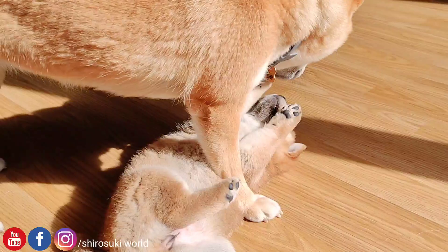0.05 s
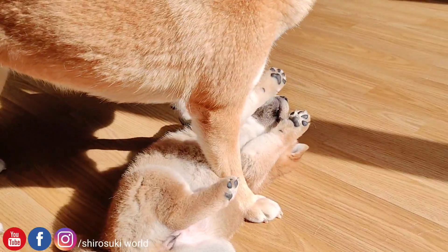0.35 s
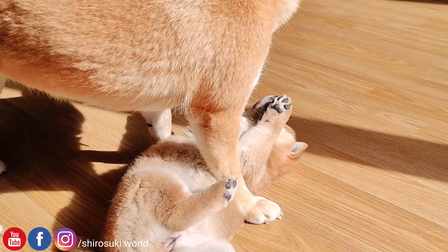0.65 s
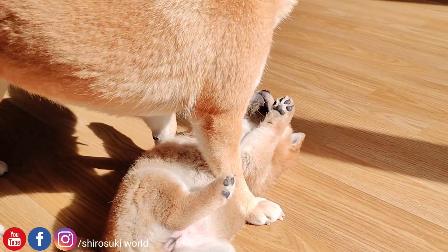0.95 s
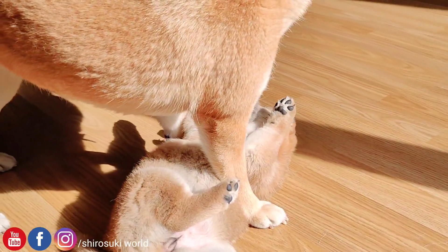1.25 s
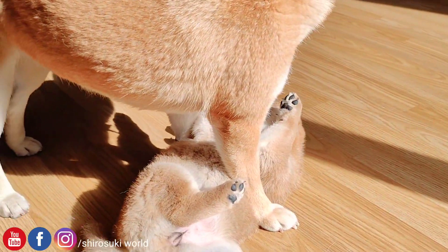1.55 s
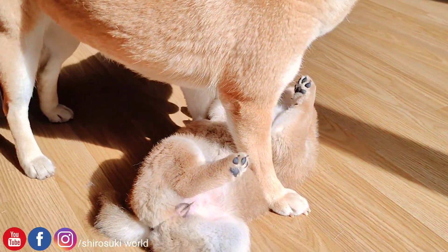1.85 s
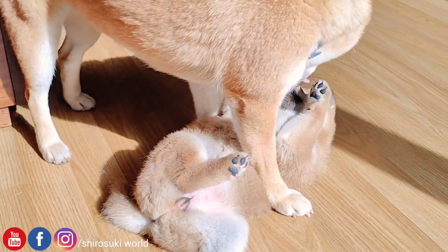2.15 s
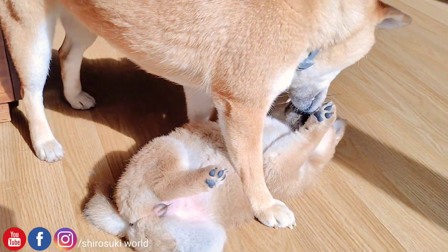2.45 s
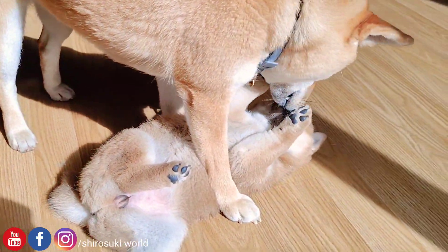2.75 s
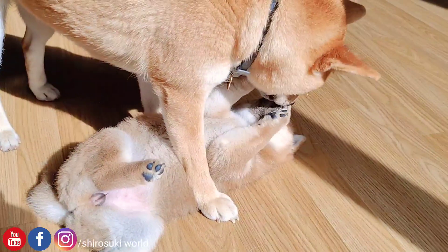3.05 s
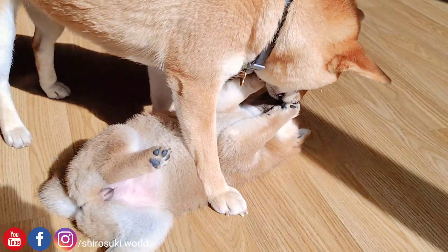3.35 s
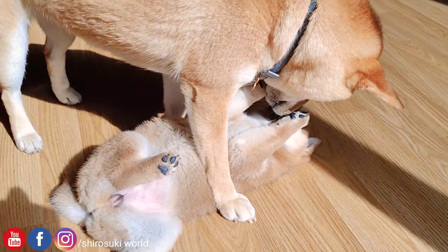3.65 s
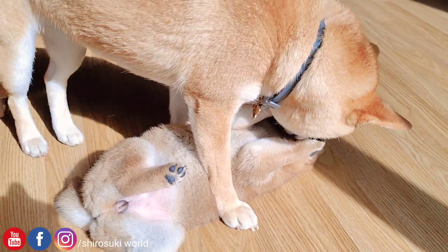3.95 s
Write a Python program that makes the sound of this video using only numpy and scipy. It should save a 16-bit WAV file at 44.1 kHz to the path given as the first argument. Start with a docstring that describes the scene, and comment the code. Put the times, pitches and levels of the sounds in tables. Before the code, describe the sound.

A muffled vehicle rumbles outside while a dog and puppy shuffle softly on a wooden floor.

```python
"""A low drone comes through the walls: probably a vehicle outside, pulling up through two gears, with rumble.
Close by, a dog stands over a puppy on a wooden floor. Fur brushes the boards, claws and teeth tick,
pads squeak on the varnish, the dog sniffs once, the puppy slides.
Under it lie the room's murmur and a faint hiss."""
import sys
import numpy as np
from scipy import signal
from scipy.fft import rfft, irfft, next_fast_len
from scipy.io import wavfile
from scipy.ndimage import map_coordinates

SR = 44100
rng = np.random.default_rng(int(sys.argv[2]) if len(sys.argv) > 2 else 0)


def to_wav(s):
    """Save 16-bit WAV."""
    ch = np.atleast_2d(s).T  # columns
    pcm = np.round(np.clip(ch, -1, 1) * 32767)  # PCM
    wavfile.write(sys.argv[1], SR, pcm.astype(np.int16))


N = 176400

# engine, per gear (time [s], firing rate [Hz], order 1 [dB], order 2 [dB], order 3 [dB])
ENGINE_LOW_GEAR = [(0.0, 46.85, -25.5, -33, -49), (0.09, 51.55, -29, -55, -50),
                   (0.15, 55.25, -23.5, -41.5, -55), (0.23, 60.6, -25, -31, -40.5),
                   (0.332, 62.17, -32.5, -45, -37), (0.55, 70.66, -28, -43.5, -50.5),
                   (0.66, 68.16, -31, -51, -63), (0.734, 70.7, -34, -54, -54), (0.775, 71, -32.5, -56, -69)]
ENGINE_HIGH_GEAR = [(1.425, 46.06, -38, -66, -61), (1.65, 47, -31, -52, -51),
                    (1.74, 48.46, -43.5, -51, -51), (1.87, 50.47, -38, -57, -60),
                    (1.94, 51.84, -58, -60, -66), (2.03, 53.14, -40, -43, -56),
                    (2.24, 56.5, -53, -35.5, -48), (2.46, 60.6, -36, -42.5, -53.5),
                    (2.62, 62.94, -46, -50, -81), (2.71, 64.86, -33, -48.5, -60),
                    (3.05, 69.36, -42.5, -56, -69), (3.22, 72.6, -35, -41.5, -46),
                    (3.27, 74, -35, -68, -64), (3.31, 72.4, -46, -62, -70), (3.49, 76.3, -44, -64, -70)]
# upper engine orders (order, level re order 3 [dB])
UPPER_ORDERS = [(4, -7), (5, -19.5), (6, -17.5), (7, -13.5)]

# envelopes (time [s], level [dB])
ROAD_LEVEL = [(0.0, -41), (0.1, -40), (0.35, -36.5), (0.7, -41), (1.29, -51), (1.47, -44.5), (2.28, -46.5),
              (2.91, -50.5), (3.27, -44.5), (3.3, -54.5), (4.0, -54.5)]  # before trim_db
RUMBLE_LEVEL = [(0,-35),(.5,-37),(.85,-43.5),(1.18,-42.5),(1.33,-47.5),(1.6,-42),(2.2,-42.5),(2.8,-42.5),(3.18,-39.5),(3.5,-49.5),(3.8,-45.5),(4,-45)]
MURMUR_GAIN = [(.75,3),(1.3,-5.5),(1.7,1),(2.7,2),(3.05,3.5),(3.55,1.5)]  # added to the mode levels
HISS_LEVEL = [(0,-65.5),(1.1,-75),(1.4,-69.5),(1.52,-58.5),(2.15,-59),(2.45,-54),(2.75,-57),(3.2,-56.5),(3.3,-65.5),(3.62,-63),(3.9,-53.5),(4,-57.5)]
FIZZ_LEVEL = [(0,-78),(1.38,-75),(1.53,-59.5),(2.4,-55),(2.9,-59),(3.3,-78)]  # topmost hiss
FUR_LEVEL = [(0,-75),(.12,-58),(.16,-55.5),(.4,-59),(1.05,-67),(1.36,-61),(1.5,-55.5),(1.62,-55),(1.78,-50.5),(2,-53.5),(2.1,-58),(2.35,-56),(2.5,-51),(2.65,-62),(2.85,-63),(3.05,-53.5),(3.3,-59.5),(3.7,-60.5),(3.83,-55)]

# noise spectra (frequency [Hz], relative level [dB])
ROAD_SPECTRUM = [(90,-46),(150,-13),(200,-1.5),(275,-1.5),(320,-11.5),(380,-10.5),(450,-9.5),(560,-10),(700,-17),(1050,-27),(1450,-23),(3000,-25.5),(11000,-45.5)]
RUMBLE_SPECTRUM = [(18,-7.5),(30,-9),(41,0.5),(55,-1.5),(75,-12.5),(97,-5.5),(300,-58.5)]
AIR_SPECTRUM = [(180, -41), (300, -3.5), (518, -4.5), (609, -12), (800, -9.5), (2030, -15.5), (2760, -20.5),
                (14000, -42)]
HISS_SPECTRUM = [(500,1),(1500,-5.5),(3500,-1.5),(5400,4.5),(6400,10),(7100,10.5),(7700,-4),(11500,-10),(14000,-0.5)]
FIZZ_SPECTRUM = [(6000,-29),(8500,-1.5),(11500,-4),(14000,-0.5)]
FUR_SPECTRUM = [(150,-28),(500,-2),(1000,7),(1600,1.5),(2600,2),(4500,2.5),(5900,-8),(9500,-5),(12000,-9),(14500,-10.5)]
SNIFF_SPECTRUM = [(300,2),(1000,-1),(2000,3),(3200,4),(5000,4.5),(6800,7),(8000,-3),(10500,-1),(13000,-14)]
SLIDE_SPECTRUM = [(120,-16),(300,-16),(700,1),(1300,1.5),(2300,-4),(4000,-5),(8000,-32)]

# room resonances (centre [Hz], half-width [Hz], level before MURMUR_GAIN [dB])
MURMUR_MODES = [(95.5,15,-57),(148.3,18,-56.5),(198,18.4,-57.5),(244,13.4,-54.5),(269.2,14,-58),(453.4,19,-66),(555,34,-68),(1044,212,-58.5)]
# claws, pads, teeth (time [s], level [dB], low edge [Hz], high edge [Hz], T60 [s], left-right [dB])
CONTACTS = [(0.14,-49,2500,10000,0.043,-8.5),(0.234,-50,6500,11000,0.012,-4),(1.611,-41,400,700,0.035,7),(1.646,-47,446,1500,0.095,-1),(1.776,-43.5,1500,5500,0.022,2),
            (1.969,-32.5,322,900,0.036,0),(1.9709,-39,1100,3800,0.02,-4),(2.4364,-40,5970,11000,.011,-2),(2.4435,-29,3000,13000,0.0089,-5),(2.4432,-35,550,2205,0.017,-4),
            (2.6765,-33,700,5030,0.0074,-15),(2.869,-45,4500,7000,0.017,-8),(2.979,-42,4220,5000,0.022,-8),(3.056,-46.5,4600,6380,0.023,-13),(3.072,-43,2600,3400,0.023,0),
            (3.201,-34.5,1200,4786,0.011,-9),(3.805,-48,400,1300,0.033,5)]
# pads on varnish (time [s], release [s], centre [Hz], half-width [Hz], level [dB])
PAD_SLIPS = [(1.448, 0.015, 2670, 550, -51), (1.469, 0.016, 2600, 450, -51), (1.62, .1, 2430, 450, -58.5)]
# dog's sniff, puppy's slide (time [s], rise [s], hold [s], release [s], level [dB])
SNIFF_SWELLS = [(3.035, 0.09, 0.054, 0.089, -47.5)]
SLIDE_SWELLS = [(3.714, 0.11, .22, .15, -52.5)]

# left-right likeness of the noise (frequency [Hz], correlation)
STEREO_CORRELATION = [(60,0.99),(130,0.78),(250,0.95),(500,0.58),(1000,-0.067)]
# microphone mismatch (frequency [Hz], left-right [dB])
MIC_BALANCE = [(200,0),(550,3),(1100,-2.5),(2200,-2),(5000,-5),(9000,2.5),(13000,-1.5)]


def amp(db):
    """Decibels to gain."""
    return 10 ** (np.asarray(db) / 20)


def unit(x):
    """Scale to rms 1."""
    return x / np.sqrt(np.mean(x ** 2) + 1e-20)


def along(points, hz):
    """Interpolate (frequency [Hz], value) on a log axis."""
    knots_hz, values = np.transpose(points)
    return np.interp(np.log(hz + 1), np.log(knots_hz + 1), values)


def curves(rows):
    """Per-sample values of each column after the time."""
    times_s, *columns = np.transpose(rows)
    return [np.interp(np.arange(N) / SR, times_s, column) for column in columns]


def wobble(rate_hz):
    """Smooth random curve, knots at rate_hz."""
    knots = rng.standard_normal(int(N * rate_hz / SR) + 4)
    return map_coordinates(knots, [np.arange(N) * rate_hz / SR])


def filtered(x, response):
    """Apply a frequency response."""
    size = next_fast_len(N + SR // 2)
    return irfft(rfft(x, size) * response(np.fft.rfftfreq(size, 1 / SR)), size)[..., :N]


def pan(db):
    """Stereo gains for a left-right difference."""
    return unit(amp(np.array([[db], [-db]]) / 2))


def noise(response):
    """Stereo noise, rms 1: alike in the bass, unrelated in the treble."""
    def mid_side(hz):
        angle = np.arccos(np.clip(along(STEREO_CORRELATION, hz), -1, 1)) / 2
        return response(hz) * np.array([np.cos(angle), np.sin(angle)])
    mid, side = filtered(rng.standard_normal((2, N)), mid_side)
    return unit(np.array([mid + side, mid - side]))


def rush(spectrum):
    """Noise with a tabled spectrum."""
    return noise(lambda hz: amp(along(spectrum, hz)))


def band(centre_hz, half_width_hz):
    """Noise in one resonance, 12 dB down at the half-width."""
    return noise(lambda hz: 1 / (1 + ((hz - centre_hz) / half_width_hz) ** 2) ** 2)


def swell(start_s, rise_s, hold_s, release_s):
    """Smooth rise, hold and release."""
    corners_s = start_s + np.cumsum([0, rise_s, hold_s, release_s])
    return np.sin(np.pi / 2 * np.interp(np.arange(N) / SR, corners_s, [0, 1, 1, 0])) ** 2


def engine(gear, jitter=0.0032, flutter_db=1, waver_db=1, fade_s=0.025):
    """The firing rate climbs through one gear; only its lowest orders pass the walls."""
    firing_hz, first_db, second_db, third_db = curves(gear)
    phase = 2 * np.pi * np.cumsum(firing_hz * (1 + jitter * wobble(24.65))) / SR
    orders = [(1, first_db), (2, second_db), (3, third_db)]
    orders += [(k, third_db + db + flutter_db * wobble(16)) for k, db in UPPER_ORDERS]
    drone = sum(amp(db) * np.sin(k * phase + rng.uniform(0, 2 * np.pi)) for k, db in orders)
    start_s, end_s = gear[0][0], gear[-1][0]
    gate = swell(start_s - fade_s, fade_s, end_s - start_s, fade_s)
    return np.sqrt(2) * drone * amp(waver_db * wobble(28.08)) * gate


def road(trim_db=-6):
    """Dull road noise and a deep rumble come with the engine."""
    roll = amp(curves(ROAD_LEVEL)[0] + trim_db) * rush(ROAD_SPECTRUM)
    rumble = amp(curves(RUMBLE_LEVEL)[0]) * rush(RUMBLE_SPECTRUM)
    return roll + rumble


def murmur():
    """Room resonances and air, drifting together in level."""
    modes = sum(amp(db) * band(hz, half_width_hz) for hz, half_width_hz, db in MURMUR_MODES)
    air = amp(-57) * rush(AIR_SPECTRUM)
    return amp(curves(MURMUR_GAIN)[0]) * (modes + air) * pan(db=-2)


def hiss(flicker_db=1.1):
    """A high hiss comes and goes on the right."""
    high = amp(curves(HISS_LEVEL)[0] + flicker_db * wobble(15)) * rush(HISS_SPECTRUM)
    fizz = amp(curves(FIZZ_LEVEL)[0]) * rush(FIZZ_SPECTRUM)
    return (high + fizz) * pan(db=-15.5)


def scratches(rate_hz=30, decay_s=0.0013, gain_db=1.5):
    """Stiff hairs snag and let go: tiny bright bursts."""
    snags = (rng.random(N) < rate_hz / SR) * rng.random(N)
    decay = np.exp(-np.arange(SR // 20) / SR / decay_s)
    return amp(gain_db) * signal.fftconvolve(snags, decay)[:N] * band(4600, 3500)


def fur(stroke_db=1.3, grain_db=2):
    """Hairs catch and slip on the boards as the puppy wriggles; a whole-body slide is duller."""
    grains = unit(amp(stroke_db * wobble(21.82) + grain_db * wobble(350)))
    brush = amp(curves(FUR_LEVEL)[0]) * (rush(FUR_SPECTRUM) + scratches())
    slide = sum(amp(db) * swell(*timing_s) for *timing_s, db in SLIDE_SWELLS) * rush(SLIDE_SPECTRUM)
    return (brush + slide) * grains * pan(db=2)


def ticks(tilt=0.55, snap=0.85, attack_s=0.0006):
    """Each claw, pad or tooth contact: one clean snap and a damped crackle, in the contact's band."""
    out = np.zeros((2, N + SR))
    t = np.arange(SR // 8) / SR
    j_hz = 1j * (np.fft.rfftfreq(len(t), 1 / SR) + 1)
    edge = lambda ratio: 1 / (1 + np.sqrt(2) * ratio + ratio * ratio) ** 2  # 24 dB/octave
    for start_s, db, low_hz, high_hz, t60_s, pan_db in CONTACTS:
        envelope = amp(db - 60 * t / t60_s) * (1 - np.exp(-t / attack_s))
        force = envelope * rng.standard_normal((2, len(t)))
        force[:, np.argmax(envelope) // 2] += snap * np.linalg.norm(envelope)
        response = edge(low_hz / j_hz) * edge(j_hz / high_hz) / j_hz ** tilt
        rms_gain = np.sqrt(np.mean(abs(response) ** 2) * (1 + snap ** 2))
        tick = irfft(rfft(force) * response, len(t)) / rms_gain
        onset = round(start_s * SR)
        out[:, onset:onset + len(t)] += tick * pan(pan_db)
    return out[:, :N]


def room(x, t60_s=0.077, echo_db=-2.5):
    """Add the short echo of a furnished room."""
    t = np.arange(SR // 2) / SR
    tail = rng.standard_normal((2, len(t))) * amp(-60 * t / t60_s)
    tail /= np.linalg.norm(tail[0])
    return x + amp(echo_db) * signal.fftconvolve(x, tail, axes=1)[:, :N]


def squeaks(rough_db=2):
    """Pads slip briefly on the varnish."""
    slips = sum(amp(db) * swell(start_s, release_s / 2, 0, release_s) * band(hz, half_width_hz)
                for start_s, release_s, hz, half_width_hz, db in PAD_SLIPS)
    return slips * amp(rough_db * wobble(120))


def sniff(flutter_db=1):
    """Air hisses unevenly through the dog's nose, buried in fur."""
    flow = sum(amp(db) * swell(*timing_s) for *timing_s, db in SNIFF_SWELLS)
    return flow * amp(-flutter_db * wobble(190)) * rush(SNIFF_SPECTRUM) * pan(db=-3)


def scene():
    """Dogs close by, vehicle beyond the walls, room background."""
    dogs = room(ticks() + squeaks()) + fur() + sniff()
    vehicle = engine(ENGINE_LOW_GEAR) + engine(ENGINE_HIGH_GEAR) + road()
    return dogs + vehicle + murmur() + hiss()


def record(dry):
    """Two band-limited microphones, slightly unlike in colour."""
    top_hz = 14350
    return filtered(dry, lambda hz: amp(np.outer([.5, -.5], along(MIC_BALANCE, hz))) * (hz < top_hz))


dry = scene()
out = record(dry)
to_wav(out)
```